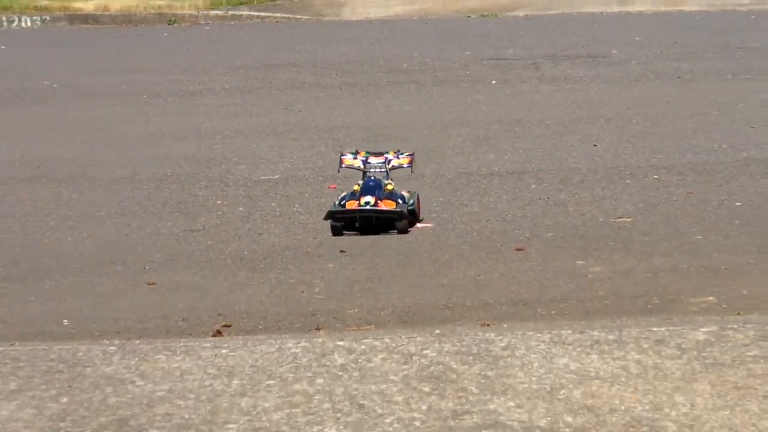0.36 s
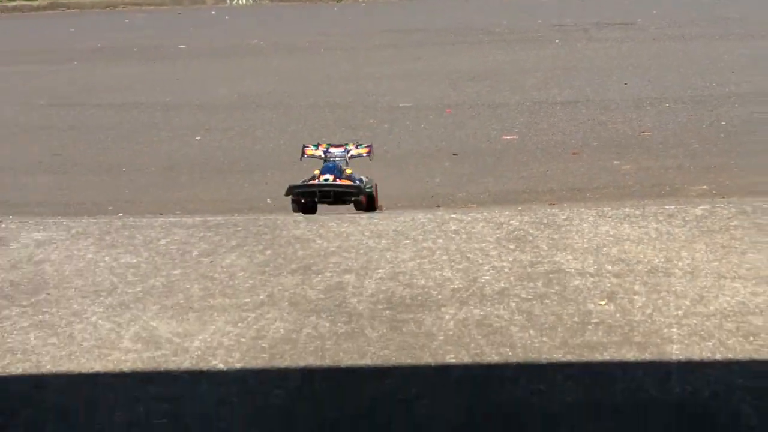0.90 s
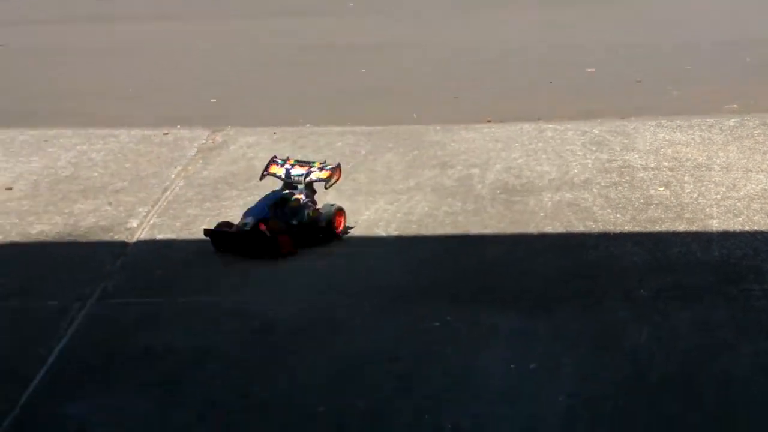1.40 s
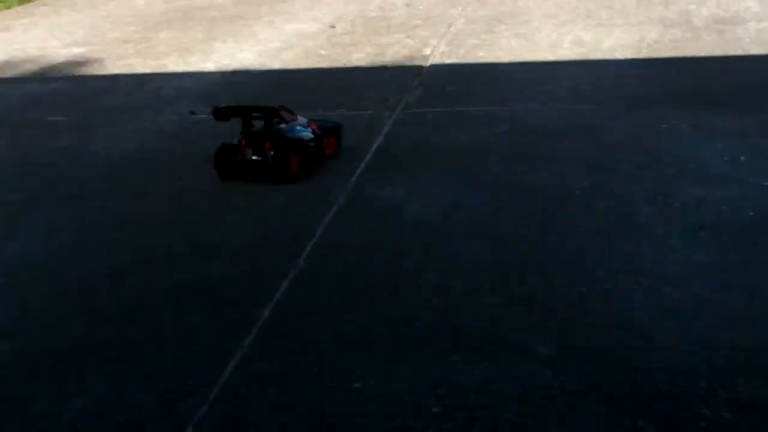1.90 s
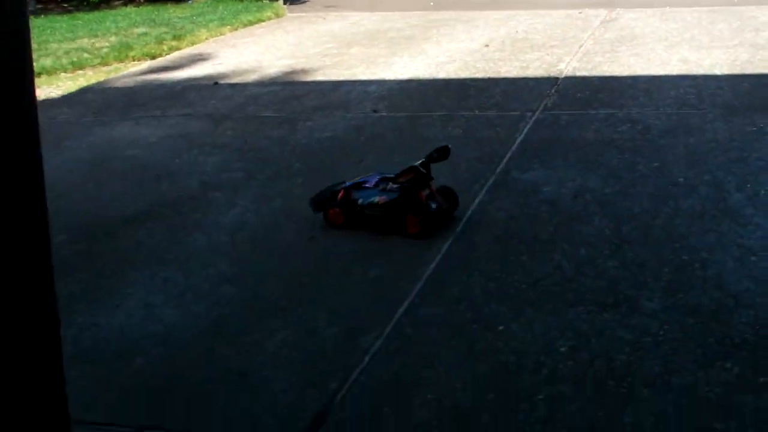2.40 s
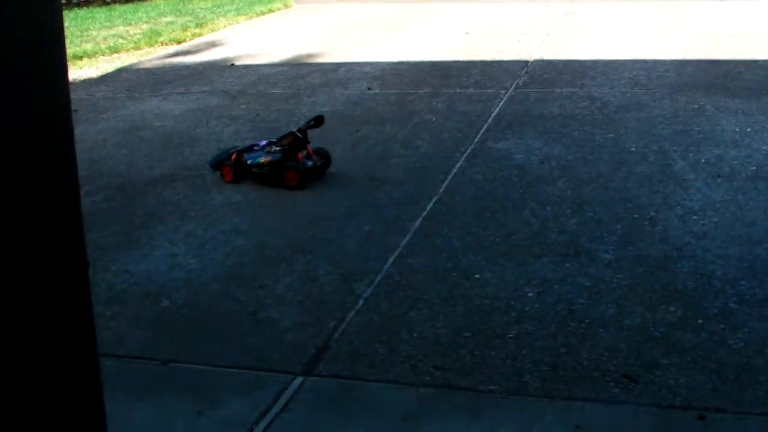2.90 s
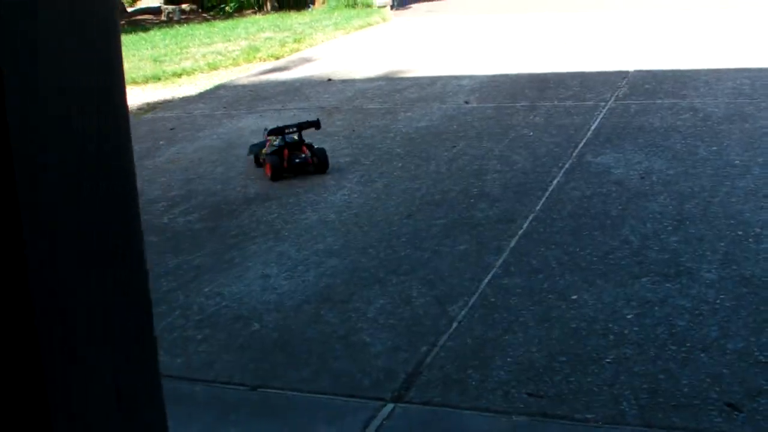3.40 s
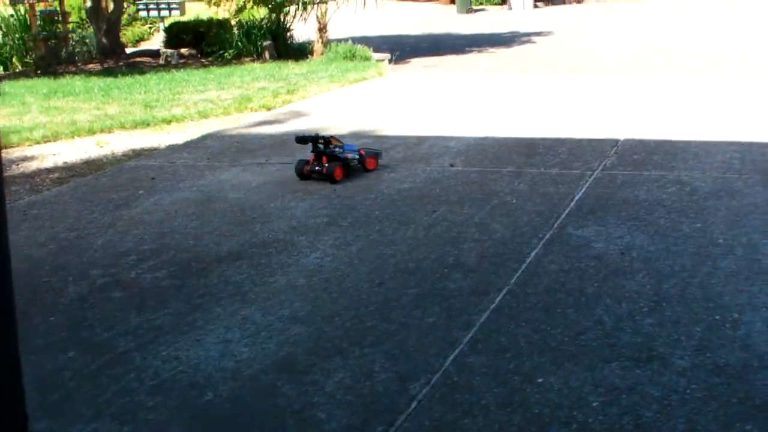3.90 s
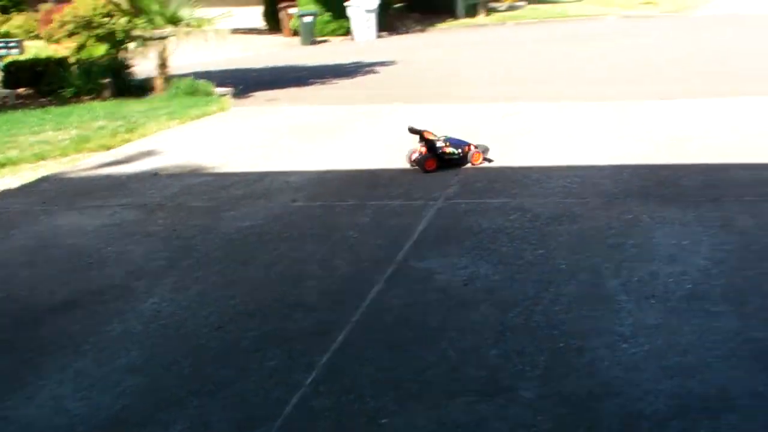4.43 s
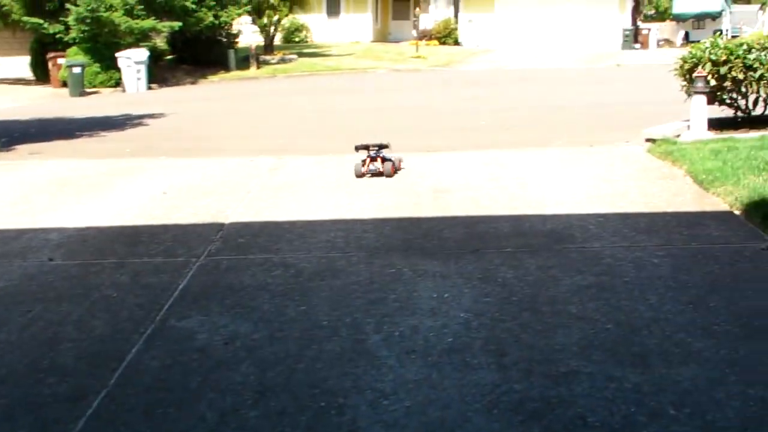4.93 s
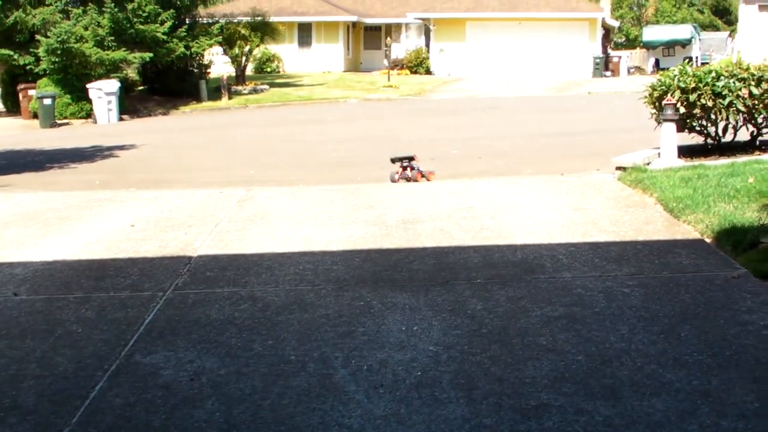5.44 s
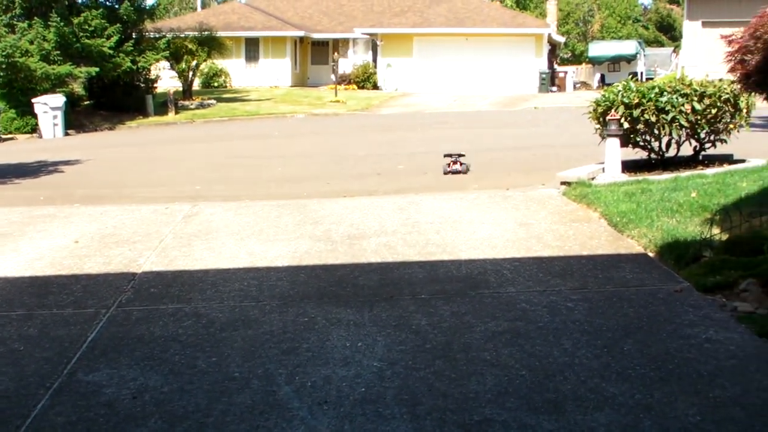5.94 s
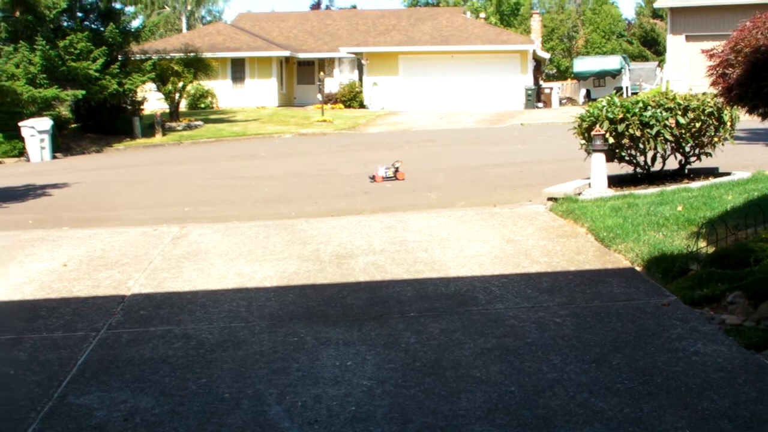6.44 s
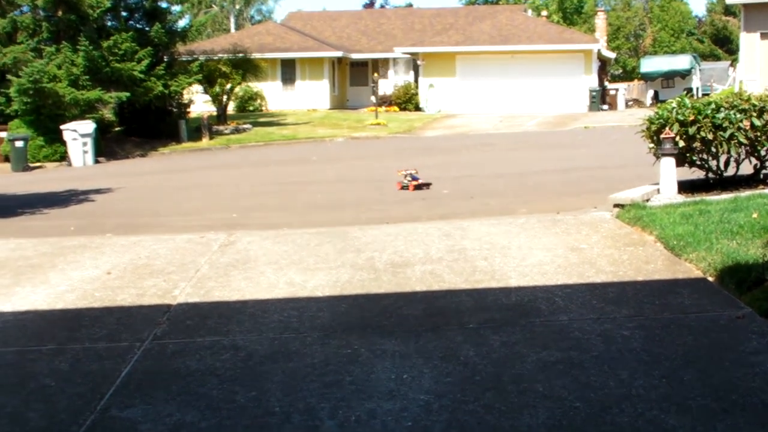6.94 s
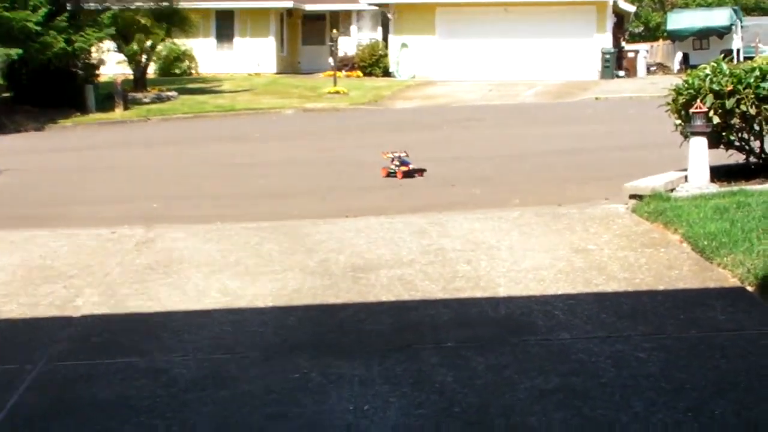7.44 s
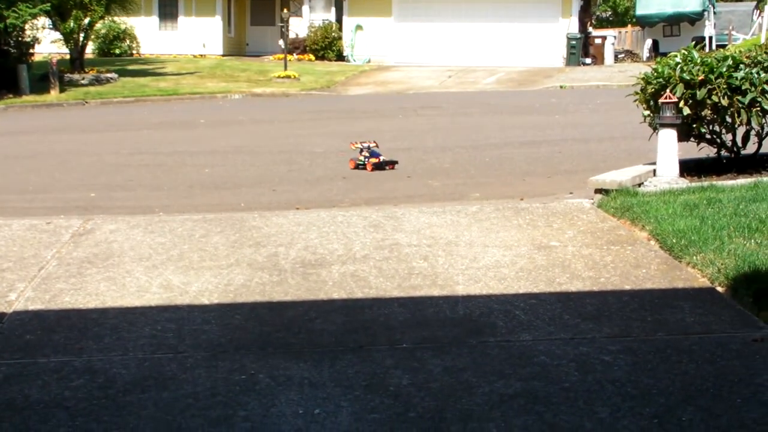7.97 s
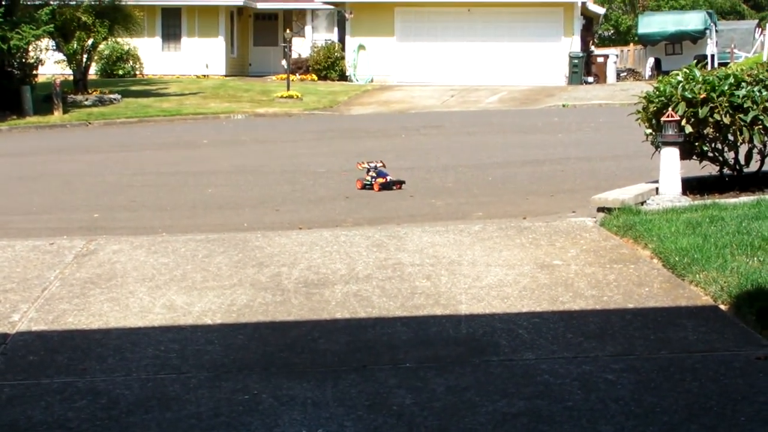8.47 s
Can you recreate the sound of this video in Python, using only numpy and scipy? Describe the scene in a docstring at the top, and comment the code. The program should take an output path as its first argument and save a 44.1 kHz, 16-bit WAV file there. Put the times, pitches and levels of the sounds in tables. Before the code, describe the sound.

A small electric toy car on concrete, heard in stereo from a garage doorway with a short bright echo. From 0 to 1.1 seconds it approaches with a shrill, steady gear whine around 3.3 kHz and fast plastic chatter, with sharper jolts near 0.9. At about 1.25 the tyres burst into a rough, hollow roar as it skids and turns, rattling harshly until 2. The noise drops to a low tyre rumble, nearly quiet at 2.6. Short rising motor whirrs come at 2.8 and 3.1. From 3.5 a lower whine climbs unevenly as the car speeds away, loudest and most clattery at 4.5 to 5.3, then thinning until 5.9. Duller rolling follows, with another dry gear rattle at 6.5 to 7 that dies by 7.3. Quiet street air and faint hum remain, with tiny knocks and one faint rising bird chirp near 8.1.

```python
"""Electric model car at a garage doorway

A small electric model car runs up a drive to a microphone in the doorway, skids, turns and speeds away
to stop in the street. Its gears whine as noise-blurred multiples of the tooth rate and chatter as beaten
noise and short jolts through a plastic chassis; the tyres roar on concrete as bands of patchy noise.
After a fading whirr, a quiet street of shaped noise, a mains hum, a chirping bird and faint knocks remain.
"""
import sys
import numpy as np
from scipy import signal
from scipy.fft import rfft, irfft, next_fast_len
from scipy.io import wavfile
from scipy.ndimage import uniform_filter1d, map_coordinates

SR = 44100
rng = np.random.default_rng(int(sys.argv[2]) if len(sys.argv) > 2 else 0)


def natural_amplitude(level_db):
    """Convert a level in decibels to a linear amplitude factor, elementwise."""
    exponent = np.asarray(level_db, float) / 20
    return 10 ** exponent


def bounce(signal):
    """Save signal as a 16-bit WAV file at the path given by the first command-line argument."""
    frames = np.transpose(np.atleast_2d(signal))
    limited = np.clip(frames, -1, 1)
    pcm = np.round(limited * 32767).astype(np.int16)
    wavfile.write(sys.argv[1], SR, pcm)


N = 378819

# drive train, rattle level before trim and brief changes: t/s, level/dB
RATTLE_LEVEL = [(0, -29.5), (.19, -28), (.3, -28.5), (.79, -25.5), (.83, -33), (1.1, -24.5), (1.24, -35),
                (1.28, -21), (1.36, -35.5), (1.38, -24.5), (1.45, -30), (1.58, -27), (1.67, -18.5),
                (1.93, -18), (2.05, -30.5), (2.42, -30), (2.54, -44.5), (2.66, -41), (2.69, -32.5),
                (2.74, -37), (2.77, -28), (2.82, -30), (2.86, -24.5), (2.915, -26), (2.93, -35),
                (2.97, -38.5), (3.03, -37), (3.05, -29.5), (3.245, -28), (3.265, -35), (3.33, -38),
                (3.36, -25.5), (3.68, -20), (4.04, -18), (4.4, -21), (4.62, -19.5), (4.72, -20),
                (4.86, -16.5), (5.05, -21.5), (5.33, -22), (5.6, -24), (5.8, -26.5), (5.92, -24),
                (5.98, -33.5), (6.53, -36), (6.55, -27.5), (6.78, -27), (6.85, -25.5), (6.95, -28.5),
                (7.03, -28.5), (7.12, -43), (7.3, -53)]
# loud gear jolts: t/s, level/dB before the mix of note and puff, ring f/Hz, length/s (held to 4-30 ms)
LOUD_JOLTS = [(.002, -12, 3210, 0.01), (0.014, -12, 3300, 0.014), (0.033, -9, 3340, 0.0098),
              (0.049, -12, 3260, 0.0091), (0.064, -12, 3230, 0.01), (0.078, -21, 3300, 0.01),
              (0.096, -15, 3270, 0.0098), (0.107, -15, 3330, 0.014), (0.137, -12, 3300, 0.031),
              (0.193, -8.5, 3380, 0.019), (0.238, -10, 3340, 0.016), (0.274, -11, 3410, 0.021),
              (0.33, -7, 3270, 0.011), (0.359, -11, 3370, 0.016), (0.376, -21, 3500, .011),
              (0.419, -10, 3330, 0.016), (0.466, -11, 3410, 0.01), (0.506, -9, 3410, 0.014),
              (0.55, -10.5, 3410, 0.017), (0.591, -16, 3490, 0.021), (0.65, -13.5, 3430, 0.017),
              (0.695, -14, 3490, 0.012), (0.734, -15, 3435, 0.014), (0.806, -8.5, 3480, 0.012),
              (0.837, -4.5, 3430, 0.024), (0.889, -4, 3290, 0.011), (0.9455, 1.5, 3390, 0.014),
              (0.982, -9, 3560, 0.019), (1.002, -3.5, 3320, 0.013), (1.081, -11, 3020, 0.025),
              (1.099, -11, 5000, 0.017), (1.1, -9, 7350, 0.013), (1.14, -17, 4940, 0.022),
              (1.262, -8.5, 2840, 0.0092), (1.277, -8, 1993, 0.016), (1.68, -7, 1870, 0.013),
              (1.697, -7, 4660, 0.016), (1.766, -7.5, 6200, 0.012), (1.821, -8, 3990, 0.0075),
              (1.845, -2, 5160, 0.0042), (1.869, -6.5, 4900, 0.017), (1.921, -6, 5400, 0.01),
              (1.963, -9, 4750, 0.0091), (1.994, -9.5, 5620, 0.021), (2.402, -13.5, 2620, 0.0077),
              (2.91, -19, 8900, 0.0092), (3.05, -11, 4150, 0.0096), (3.088, -13, 5070, 0.018),
              (3.173, -16, 4800, 0.022), (3.193, -14.5, 4690, 0.017), (3.24, -12, 4750, 0.0096),
              (3.347, -19, 2700, 0.013), (4.147, -7, 4500, 0.024), (4.19, -6, 4400, 0.0076),
              (4.207, -10.5, 4720, 0.021), (4.246, -4, 4820, 0.022), (4.284, -5, 4810, 0.0087),
              (4.442, -7, 4780, 0.013), (4.558, -3, 5660, 0.013), (4.745, -3.5, 4870, 0.016),
              (4.786, -16, 2630, 0.013), (4.808, -4, 5490, 0.012), (4.826, -4, 2645, 0.02),
              (4.842, -1.5, 5620, 0.016), (4.858, -8, 2800, 0.024), (4.884, -5, 2725, 0.016),
              (4.899, -5, 2730, .017), (4.919, -3, 4950, .016), (4.944, -7, 4780, 0.0078),
              (4.962, 1, 4560, 0.0079), (4.979, -5, 5770, 0.03), (5.004, -2, 3530, 0.03),
              (5.039, -6, 5600, .016), (5.087, -4, 5620, 0.019), (5.144, -5.5, 5744, 0.013),
              (5.187, -12, 5600, .014), (5.212, -13, 5750, 0.018), (5.264, -13, 5800, 0.02),
              (5.285, -12, 4000, 0.012), (5.307, -14, 4680, 0.015), (5.337, -5, 4020, 0.0084),
              (5.36, -10, 3300, 0.0081), (5.37, -2.5, 4600, 0.018), (5.408, -6, 4610, 0.021),
              (5.44, -6, 4430, 0.013), (5.465, -7, 3830, 0.0083), (5.483, -4, 4670, 0.019),
              (5.546, -10, 4950, 0.015), (5.609, -8, 4550, 0.014), (5.63, -22, 4767, 0.011),
              (5.652, -13, 4710, 0.011), (5.671, -12, 4580, 0.014), (5.709, -8.5, 4570, 0.017),
              (5.755, -10.5, 4600, 0.0099), (5.809, -3.5, 4704, 0.02), (5.856, -5.5, 5540, 0.017),
              (5.868, -8, 4010, 0.021), (5.899, -5, 5590, 0.011), (5.912, -6, 3920, 0.015),
              (6.444, -12.5, 3680, 0.012), (6.536, -8.5, 4950, 0.016), (6.539, -19, 1786, 0.023),
              (6.553, -15, 1996, 0.026), (6.581, -12, 2030, 0.01), (6.601, -15, 3880, 0.013),
              (6.623, -9.5, 4800, 0.015), (6.648, -10, 5180, 0.0092), (6.672, -11, 5110, 0.01),
              (6.687, -11, 3950, 0.015), (6.707, -16, 2690, 0.016), (6.728, -12, 2720, 0.015),
              (6.752, -9, 2840, 0.012), (6.764, -9, 2800, 0.013), (6.784, -7.5, 2950, .013),
              (6.8, -1.5, 3040, 0.0077), (6.818, -15, 5050, .012), (6.876, -16, 4920, 0.013),
              (6.896, -14, 3740, 0.012), (6.91, -16, 2590, 0.022), (6.934, -9.5, 2796, 0.019),
              (6.942, -11.5, 4900, 0.017), (6.964, -17, 4900, .012), (6.997, -17.5, 1960, 0.013)]
# broad gear noise: f/Hz, relative level/dB per Hz
GEAR_HISS = [(650, -16.5), (1100, -12), (1500, -5), (2000, -1.5), (3400, -1.5), (6000, -6), (7500, -3),
             (8300, -6.5), (9500, -3), (12000, -8), (15000, -17)]
# motor speed, one table for each pull of the throttle: t/s, tooth rate f/Hz before slip
TOOTH_RATE = [
    [(0, 3210), (.2, 3290), (.45, 3390), (.8, 3490), (1.05, 3400)],
    [(2.75, 575), (2.81, 610), (2.86, 675), (2.92, 715), (2.96, 725)],
    [(3.07, 620), (3.16, 650), (3.2, 690), (3.28, 700)],
    [(3.48, 750), (3.56, 765), (3.62, 900), (3.7, 1035), (3.82, 1130), (3.88, 1235), (4.0, 1270),
     (4.1, 1350), (4.22, 1400), (4.3, 1550), (4.4, 1615), (4.5, 1720), (4.57, 1820), (4.62, 1915),
     (4.68, 1940), (4.8, 2020), (4.92, 2450), (4.94, 2420)],
    [(4.95, 2380), (4.975, 2050), (5.0, 1870), (5.06, 1890), (5.14, 1965), (5.28, 2010), (5.5, 2250),
     (5.95, 2350)],
]
# how the car stands and runs: t/s, heading (0 front, 1 side, 2 rear to the microphone),
# chassis ring over the hiss level/dB, chatter depth/dB
CAR_POSE = [(0, 0, 0, 3.5), (1.05, 0, 1, 3), (1.2, .5, -5, 3), (1.6, 1.5, -4, 3.5), (2.0, 1.7, -3, 4),
            (2.4, 1.5, -4, 3), (2.6, 1, 10, 1), (2.9, 1, 10, 1), (3.1, 1.4, 3, 2), (3.9, 1.4, 6, 2),
            (4.3, 2, 7, 2.5), (4.7, 2, 2, 2.5), (5.3, 1.8, 3, 3), (5.85, 1.6, 3, 4), (6.0, 2, -3, 2),
            (6.5, 2, -2, 3), (6.6, 2, 0, 3), (6.82, 2, 1, 2), (7.0, 1.8, 2, 1.5), (7.3, 2, -3, 2)]
# plastic chassis resonances: f/Hz, nominal width/Hz, level/dB heard from the front, the side, the rear
CHASSIS_NOTES = [(1800, 110, -5, -14, -12), (2100, 200, -16, -9, -10), (2850, 220, -5, -12, -7),
                 (3420, 260, -5, -9, -6), (3980, 240, -11, -1, -4), (4350, 350, -18, 0, -9),
                 (4780, 320, -16, -2, 0), (5720, 300, -18, -10, -3), (6170, 450, -5, -15, -14),
                 (7550, 350, -11, -10, -6)]


def unit(x):
    """Scaled to rms 1."""
    return x / np.sqrt(np.mean(x ** 2) + 1e-20)


def along(points, hz):
    """(Hz, value) points on a log axis."""
    f, v = np.transpose(points)
    return np.interp(np.log(hz + 1), np.log(f + 1), v)


def curves(rows):
    """One value per sample for each column after the time."""
    s, *cols = np.transpose(rows)
    return [np.interp(np.arange(N) / SR, s, c) for c in cols]


def during(rows, fade=.012):
    """1 while a table lasts, with soft ends of fade seconds outside it."""
    t = np.arange(N) / SR
    rise = t - rows[0][0] + fade
    fall = rows[-1][0] + fade - t
    return np.clip(np.minimum(rise, fall) / fade, 0, 1)


def wobble(rate):
    """A smooth random curve, rate knots a second."""
    knots = rng.standard_normal(int(N * rate / SR) + 4)
    return map_coordinates(knots, [np.arange(N) * rate / SR])


def filtered(x, response):
    """x times a complex response of frequency."""
    m = next_fast_len(N + SR // 2)
    return irfft(rfft(x, m) * response(np.fft.rfftfreq(m, 1 / SR)), m)[..., :N]


def mode(centre, width, db):
    """Response of one resonance, centre and width in Hz."""
    return lambda f: natural_amplitude(db) * 1j * f * width / (centre * centre - f * f + 1j * f * width)


def patchy(patchy_db, channels=1):
    """White noise with time-frequency patches of random gain."""
    z = signal.stft(rng.standard_normal((channels, N)), nperseg=256)[2]
    field = rng.standard_normal(z.shape[1:])
    field = uniform_filter1d(uniform_filter1d(field, 3, 0), 5, 1)
    return signal.istft(z * natural_amplitude(patchy_db * unit(field)), nperseg=256)[1][:, :N]


def even(swell):
    """A swell that keeps the mean power, averaged over 1/8 s."""
    return swell / np.sqrt(np.abs(uniform_filter1d(swell ** 2, SR // 8)))


def street():
    """Far traffic and air as wide shaped noise, with a wavering mains hum."""
    # street colour: f/Hz, relative level/dB per Hz
    colour = [(15, -55), (25, -36), (40, -25), (62, -15.5), (90, -5), (169, -9), (283, -15.5), (400, -6.5),
              (569, -12.5), (830, -12.5), (1500, -20.5), (2100, -20.5), (7360, -26), (12000, -29.5),
              (15700, -30)]
    # street noise: t/s, level/dB
    street_level = [(0, -44.5), (2, -46.5), (4, -43.5), (6, -47), (7.3, -46), (7.8, -48), (8.59, -49.5)]
    # likeness of the two channels: f/Hz, correlation (-1 to 1)
    alike = [(30, .8), (60, 0.99), (180, 0.82), (550, 0.64), (1650, 0.77), (4970, 0.15), (15000, -0.54)]

    def mid_side(hz):
        turn = np.arccos(np.clip(along(alike, hz), -1, 1)) / 2
        return natural_amplitude(along(colour, hz)) * [np.cos(turn), np.sin(turn)]

    mid, side = filtered(patchy(0.99, channels=2), mid_side)
    air = unit(np.array([mid + side, mid - side]))
    hum = natural_amplitude(-59.5 + 2.6 * wobble(5.5)) * np.sin(2 * np.pi * 120 * np.arange(N) / SR)
    return natural_amplitude(curves(street_level)[0]) * air + hum


def garage(x):
    """The walls behind the microphone answer, each frequency dying at its own speed."""
    # decay of the garage: f/Hz, t60/s
    decay = [(300, 0.19), (2000, 0.31), (10000, 0.084)]
    # echo colour: f/Hz, level/dB
    wet_level = [(300, -28), (1000, -15), (4000, -8), (12000, 0.5)]
    hz, t, z = signal.stft(rng.standard_normal((2, SR // 3)), SR, nperseg=256)
    tail = signal.istft(z * natural_amplitude(-60 * t / along(decay, hz)[:, None]), SR, nperseg=256)[1]
    tail = tail / np.linalg.norm(tail[0])
    late = np.pad(x, (120, 0))[None]  # delay in samples, about 2.7 ms
    wet = signal.fftconvolve(late, tail, axes=1)[:, :N]
    return filtered(wet, lambda hz: natural_amplitude(along(wet_level, hz)))


def bird():
    """One faint rising chirp, a gliding sine."""
    # chirp: t/s, f/Hz, rms level/dB
    chirp = [(8.125, 2220, -68), (8.14, 2280, -60), (8.17, 2420, -60), (8.19, 2500, -66)]
    hz, db = curves(chirp)
    return during(chirp) * natural_amplitude(db) * np.sqrt(2) * np.sin(2 * np.pi * np.cumsum(hz) / SR)


def knocks():
    """Dull plastic knocks and ticks: decaying sines with a brief noise at the start."""
    # knocks: t/s, level/dB before trim and onset, ring f/Hz, t60/s
    hits = [(0.829, -9.5, 730, 0.035), (1.177, -14, 722, 0.091), (1.265, -11, 396, 0.12),
            (2.132, -18.5, 1085, 0.094), (2.386, -21, 692, 0.066), (3.295, -25, 438, .1),
            (4.69, -17.5, 681, 0.11), (4.748, -19, 395, 0.067), (4.855, -22, 387, .07),
            (4.9, -15.5, 407, 0.1), (4.936, -17, 437, 0.085), (6.94, -24, 650, 0.12),
            (6.993, -21, 963, .06), (7.004, -24, 439, 0.17), (7.029, -14, 1720, 0.033),
            (7.2569, -16, 2600, 0.007), (7.2997, -10, 2840, 0.0056), (7.591, -27, 416, 0.044),
            (8.383, -25, 496, 0.037)]
    out, t = np.zeros(N + SR), np.arange(SR // 8) / SR
    for s, db, hz, t60 in hits:
        click = 0.2 * rng.standard_normal(len(t)) * natural_amplitude(-60 * t / 0.01)
        ring = np.sin(2 * np.pi * hz * t) + click
        onset = 1 - np.exp(-t / 0.0022)
        out[round(s * SR):][:len(t)] += natural_amplitude(db - 4.0 - 60 * t / t60) * onset * ring
    return out[:N]


def tyres():
    """Knobbly tread drums on the grit: a low boom, two shell notes, a thud and a duller wash."""
    # roar of the tyres: t/s, level/dB before the layer trims
    roar_level = [(0, -32), (.84, -29), (1.07, -31.5), (1.15, -36), (1.19, -22.5), (1.26, -24.5),
                  (1.28, -16), (1.4, -20.5), (1.57, -19), (1.64, -22.5), (1.7, -20.5), (1.76, -26),
                  (1.9, -24.5), (2.0, -31), (2.3, -28), (2.4, -28), (2.55, -46), (2.64, -37), (3.26, -37.5),
                  (3.32, -33.5), (3.77, -35), (4.7, -29), (5.05, -31), (5.6, -31), (6.33, -28), (6.92, -43),
                  (7.0, -37.5), (7.15, -49), (7.4, -75)]
    # low boom over the roar, before trim and sway: t/s, level/dB
    boom_level = [(0, -4.5), (.8, -1.5), (1.1, 4), (1.21, -38), (1.28, -9), (1.45, 6), (1.6, -5.5),
                  (1.85, 4), (2.2, -31), (2.4, 0), (2.85, -22), (3.3, -7), (4.6, -4.5), (4.9, -3),
                  (5.7, -3), (6.35, -16.5), (6.95, -3), (7.4, 0)]
    # wash over the roar: t/s, level/dB
    wash_level = [(0, -7), (1.1, -3), (1.3, -8), (1.45, -9), (1.6, -2.5), (2, -2.5), (2.6, -2.5), (3.5, -2),
                  (4.6, -5), (5.0, -2.5), (5.8, -10), (6.0, -10.5), (6.5, -9.5), (6.7, -5), (7.4, 4.5)]
    # cavity, two shell notes and thud: f/Hz, width/Hz of a single pass, level/dB (evened out by unit)
    tread = [(450, 100, 0), (720, 120, 0), (870, 140, 0), (150, 140, 0)]
    grit = natural_amplitude(0.7 * wobble(70) + 1.25 * wobble(18))

    def drum(row):
        resonance = mode(*row)
        return unit(grit * filtered(patchy(2.8)[0], lambda hz: resonance(hz) ** 2))  # two passes

    def dull(hz):
        low = 1 / (1 + (hz / 1050) ** 6)
        high = 0.89 / (1 + (hz / 2200) ** 4)
        return (low + high) / (1 + (360 / (hz + 1)) ** 10)

    boom, shell, rim, thud = (drum(row) for row in tread)
    wash = unit(grit * filtered(patchy(0.95)[0], dull))
    boom_db = curves(boom_level)[0] + 4 * wobble(12) - 10.0
    layers = natural_amplitude(boom_db) * boom + natural_amplitude(-8.5) * shell + natural_amplitude(-15) * rim + natural_amplitude(-30.5) * thud
    layers = layers + natural_amplitude(curves(wash_level)[0]) * wash
    return during(roar_level) * natural_amplitude(curves(roar_level)[0]) * layers


def chatter():
    """Slack in the gears takes up in uneven beats, in step with the loud jolts; about rms 1 around 0."""
    # chatter before its random wander: t/s, beat rate f/Hz
    beat_rate = [(0, 66), (.71, 66), (1.34, 47.4), (1.95, 48), (2.56, 70.4), (4.0, 75), (4.37, 51),
                 (5.12, 43), (5.7, 48), (6.3, 35.5), (6.79, 58), (7.3, 58)]
    half_beat_s, pull_s = .008, .016  # crest to trough; how far a loud jolt draws the beat into step
    turns = np.cumsum(curves(beat_rate)[0]) / SR + .09 * wobble(14)
    free = unit(np.cos(2 * np.pi * turns) * (1 + .35 * wobble(25)) + .3 * wobble(30))
    crests = np.sort([s + length / 2 for s, _, _, length in LOUD_JOLTS])
    t = np.arange(N) / SR
    k = np.clip(np.searchsorted(crests, t), 1, len(crests) - 1)
    away = np.minimum(abs(t - crests[k - 1]), abs(t - crests[k]))  # seconds to the nearest crest
    pull = np.clip(2 - 2 * away / pull_s, 0, 1)
    in_step = np.sqrt(2) * np.cos(np.pi * np.minimum(away / half_beat_s, 1))
    return (1 - pull) * free + pull * in_step


def chassis(face):
    """Gain of the chassis heard from one side: steep peaks, dark valleys."""
    def gain(f):
        power = 0
        for row in CHASSIS_NOTES:
            centre, width = row[:2]
            power = power + natural_amplitude(2 * row[2 + face]) / (1 + (2 * (f - centre) / width) ** 2) ** 1.5
        return np.sqrt(power)
    return gain


def notes(beat):
    """Notes the running car holds for a while: narrow bands that waver and throb with the chatter."""
    # held notes: from t/s, to t/s, from f/Hz, to f/Hz, level/dB before throb, rate of random spread/Hz
    held = [(0, 0.298, 1790, 1800, -43, 76), (.32, 0.777, 1800, 1797, -38.5, 45),
            (0, 0.803, 2880, 2863, -38.5, 277), (1.38, 1.623, 480, 452, -31, 70),
            (1.45, 1.739, 853, 860, -29, 83), (2.168, 2.422, 721, 715, -36.5, 64),
            (2.671, 2.773, 4150, 4140, -42, 400), (2.772, 2.903, 4150, 4340, -32.5, 800),
            (3.491, 3.548, 760, 763, -34.5, 28), (3.66, 3.86, 3540, 3460, -33.5, 200),
            (3.642, 3.86, 4700, 4560, -31.5, 210), (3.72, 4.0, 5850, 5700, -35, 350),
            (3.93, 4.058, 3840, 4050, -33, 150), (4.1, 4.3, 4820, 4760, -30.5, 216),
            (4.698, 4.826, 3950, 3980, -32, 150), (4.779, 4.931, 2665, 2734, -32, 131),
            (5.029, 5.29, 5710, 5790, -31, 150), (5.3, 5.756, 3450, 3450, -37.5, 250),
            (4.901, 5.3, 3390, 3340, -32.5, 350), (6.999, 7.108, 2150, 752, -46, 60),
            (7.201, 7.58, 1900, 1864, -57, 500), (7.62, 8.05, 1830, 1810, -64, 300)]
    t, out = np.arange(N) / SR, np.zeros(N)
    throb = even(natural_amplitude(3.5 * beat))  # depth in dB
    for s0, s1, hz0, hz1, db, width_hz in held:
        on = during([(s0,), (s1,)])
        i = on > 0
        phase = 2 * np.pi * np.cumsum(np.interp(t[i], [s0, s1], [hz0, hz1])) / SR
        knots = [(t[i] - s0 + .02) * width_hz]
        a, b = (map_coordinates(rng.standard_normal(500), knots) for _ in range(2))
        clean = 50 / width_hz  # the narrower the note, the purer its tone
        band = (clean + a) * np.sin(phase) + b * np.cos(phase)
        out[i] += natural_amplitude(db) * (on * throb)[i] * band / np.sqrt(1 + clean ** 2 / 2)
    return out


def small_jolts():
    """Chance jolts follow the rattle's level; they ring facing chassis notes or, under throttle, teeth."""
    per_s, clear_s, length_s = 18, .022, 0.016  # never on top of a loud jolt
    over_db, scatter_db = -5.5, 4  # level against the rattle, before slack, and its scatter
    count = int(RATTLE_LEVEL[-1][0] * per_s)
    late, size = rng.random(count), rng.standard_normal(count)
    pick = rng.gumbel(size=(count, len(CHASSIS_NOTES)))
    s = (np.arange(count) + late) / per_s
    i = (s * SR).astype(int)
    heading, _, depth_db = (c[i] for c in curves(CAR_POSE))
    plastic = np.array(CHASSIS_NOTES)[1:]  # without the lowest note
    facing = plastic[:, 2:][:, np.round(heading).astype(int)].T
    hz = plastic[:, 0][np.argmax(facing / 2 + pick[:, 1:], axis=1)]  # louder notes are likelier
    mesh_hz = sum((during(rows) > .5) * curves(rows)[0] for rows in TOOTH_RATE)[i]
    multiple = np.maximum(np.round(hz / (mesh_hz + 1)), 1)
    hz = np.where(mesh_hz > 0, multiple * mesh_hz, hz)
    slack_db = 2 * (depth_db - 3)  # more slack, harder jolts
    db = curves(RATTLE_LEVEL)[0][i] + over_db + slack_db + scatter_db * size
    clear = np.abs(s[:, None] - np.array(LOUD_JOLTS)[:, 0]).min(axis=1) > clear_s
    rows = zip(s, db, hz, np.full(count, length_s))
    return [row for row, ok in zip(rows, clear) if ok]


def jolts():
    """Each jolt swells and dies: a puff of tooth noise with one note standing out."""
    out, t = np.zeros(N + SR), np.arange(SR // 32) / SR
    noise, heading = rng.standard_normal(N), curves(CAR_POSE)[0]

    def heard_from(face):
        colour = lambda hz: natural_amplitude(along(GEAR_HISS, hz)) * (0.25 + chassis(face)(hz))
        return unit(filtered(noise, colour))

    puffs = np.where(heading < .5, heard_from(0), heard_from(2))
    for s, db, hz, length in LOUD_JOLTS + small_jolts():
        u = np.clip(t / np.clip(length, .004, .03), 0, 1)
        swell = np.sin(np.pi * u ** .9) ** 2  # power under 1: peaks a little early
        note = np.sin(2 * np.pi * hz * t + .12 * np.cumsum(rng.standard_normal(len(t))))
        i = round(s * SR)
        out[i:i + len(t)] += natural_amplitude(db) * swell * (0.24 * note + 0.11 * puffs[i:i + len(t)])
    return out[:N]


def rattle(beat):
    """Tooth noise, beaten by the chatter, rings the chassis; turning the car changes what rings."""
    # short rises and one dip of the rattle: t/s, length/s, change of level/dB
    brief_changes = [(0.202, 0.022, -3), (0.841, 0.061, 11.5), (0.936, 0.03, 6), (0.998, 0.035, 3),
                     (1.084, 0.085, 1.5), (2.088, 0.06, 4.5), (2.24, 0.05, 5), (4.516, 0.11, 1.5),
                     (5.34, 0.022, 4), (6.441, 0.017, 13)]
    # treble of the rattle over its body, before trim: t/s, level/dB
    treble_level = [(0, -8.5), (1.1, -4.5), (1.26, -13), (1.38, -4), (2.4, -2.5), (2.8, -12), (3.0, 0.5),
                    (3.06, -8), (3.7, -8), (4.45, 1), (5.3, -2), (6.5, -1.5), (6.8, -6), (7.0, -10),
                    (7.1, -9), (7.3, -30)]
    db = curves(RATTLE_LEVEL)[0] - 5.5
    for s, length, gain_db in brief_changes:
        db = db + gain_db * during([(s,), (s + length,)])
    heading, ring_db, depth_db = curves(CAR_POSE)
    noise = patchy(4.3)[0]
    ring = 0
    for face in range(3):
        share = np.clip(1 - abs(heading - face), 0, 1)  # blends neighbouring sides
        ring = ring + share * unit(filtered(noise, chassis(face)))
    broad = filtered(patchy(2.44)[0], lambda hz: natural_amplitude(along(GEAR_HISS, hz)))
    top = filtered(broad, lambda hz: 1 / (1 + (6500 / (hz + 1)) ** 8))
    body = (natural_amplitude(ring_db) * ring + unit(broad - top)) / np.sqrt(1 + natural_amplitude(2 * ring_db))
    treble = natural_amplitude(curves(treble_level)[0] - 4.5) * unit(top)
    return during(RATTLE_LEVEL) * natural_amplitude(db) * even(natural_amplitude(depth_db * beat)) * (body + treble)


def whine(beat):
    """Tooth contacts sing at the mesh rate; uneven teeth spread each multiple into a narrow band."""
    # in each pull, before beat and chassis: t/s, level/dB of tooth rate, 2nd multiple, 3rd multiple
    loads = [
        [(0, -32.5, -60, -66), (.2, -31.5, -60, -66), (.45, -34, -62, -66), (.8, -42, -60, -66),
         (1.05, -47, -60, -66)],
        [(2.75, -43, -39, -40), (2.82, -32, -39, -43), (2.87, -22, -31.5, -42), (2.93, -26.5, -35, -39),
         (2.96, -31, -41, -45)],
        [(3.07, -32.5, -36.5, -32), (3.15, -34, -39, -55), (3.19, -29.5, -32.5, -41), (3.24, -33, -35, -44),
         (3.28, -46, -36, -55)],
        [(3.48, -48, -29, -60), (3.53, -52, -38, -45), (3.58, -44, -46, -38), (3.68, -30.5, -38, -51),
         (3.78, -28, -43, -40), (3.9, -29, -28, -30), (4.0, -22, -37, -29), (4.07, -30, -47, -46),
         (4.11, -30.5, -29, -31), (4.2, -27.5, -44, -44), (4.3, -31.5, -33, -28.5), (4.42, -35.5, -29.5, -26),
         (4.5, -33.5, -30, -32), (4.57, -25, -25, -28), (4.68, -34, -37, -40), (4.73, -54, -31, -50),
         (4.85, -58, -41, -52), (4.94, -45, -23, -47)],
        [(4.95, -28, -28, -48), (4.98, -23.5, -23, -36), (5.06, -25, -22.5, -26), (5.12, -25.5, -23, -43),
         (5.2, -25.5, -26, -42), (5.28, -32.5, -32, -46), (5.33, -46, -59, -49), (5.45, -34, -35, -45),
         (5.6, -44, -30, -58), (5.95, -54, -51, -60)],
    ]
    # teeth in mesh in each pull: steadiness (ratio), beat depth/dB, loss/dB from the 3rd multiple
    # to the 4th, and to the 5th
    grips = [(2.2, 5, 20, 20), (3, -2, 4, 6.5), (1, -0.5, 9, 5.7), (1.2, 1.5, 7, 8), (1.3, 2.5, 9, 20)]
    # the wheels slip and grip: t/s, random share of speed (ratio), random break-up/dB
    slipping = [(0, .005, 1), (2.7, .006, 1.5), (3.0, .015, 3), (3.6, .022, 3), (4.25, .025, 3),
                (4.32, .008, 1.5), (4.7, .014, 3), (5.0, .008, 2), (5.95, .008, 2.5)]
    share, break_db = curves(slipping)
    slip = 1 + share * wobble(75) + .012 * beat  # each beat gives and takes a share of speed
    flutter = break_db * wobble(22)
    spread = [(wobble(150 * k), wobble(150 * k)) for k in (1, 2, 3, 4, 5)]
    out = np.zeros(N)
    for speed, load, (steady, depth_db, fourth_db, fifth_db) in zip(TOOTH_RATE, loads, grips):
        on = during(speed)
        i = on > 0
        phase = 2 * np.pi * np.cumsum((curves(speed)[0] * slip)[i]) / SR
        first_db, second_db, third_db = curves(load)
        swell = (on * even(natural_amplitude(depth_db * beat + flutter)))[i]
        levels = [first_db, second_db, third_db, third_db - fourth_db, third_db - fifth_db]
        for k, (db, (a, b)) in enumerate(zip(levels, spread), 1):
            clean = steady / k ** .7  # higher multiples blur more
            band = (clean + a[i]) * np.sin(k * phase) + b[i] * np.cos(k * phase)
            out[i] += natural_amplitude(db[i]) * swell * band / np.sqrt(1 + clean ** 2 / 2)
    return filtered(out, lambda f: .7 + .8 * chassis(2)(f))  # louder where it crosses a rear chassis note


def scene():
    """The car, its echo from the garage, the bird and the street."""
    beat = chatter()
    car = whine(beat) + rattle(beat) + notes(beat) + jolts() + tyres() + knocks()
    car = filtered(car, lambda hz: 1 / (1 + (90 / (hz + 1)) ** 4))  # too small to radiate deep bass
    return car + garage(car) + bird() + street()


def roll_off(x):
    """The treble ends steeply here."""
    return signal.sosfilt(signal.butter(12, 15810, fs=SR, output="sos"), x)


def record(dry):
    """The stereo pair leans a little, the treble dips and ends, and half the line frequency is notched out."""
    # treble colour of the whole sound, a dip near 12 kHz and a cut above 15.1 kHz: f/Hz, level/dB
    treble_colour = [(8500, 0.5), (10500, -2), (11400, -8), (12000, -13), (12700, -4), (14000, 0),
                     (15100, 0), (15900, -60)]
    # lean of the stereo pair: f/Hz, left minus right level/dB
    lean = [(60, -1), (240, -0.5), (950, -1), (3770, -1.0), (15000, -0.5)]
    notch_hz = 7875  # half the camera's line frequency

    def response(hz):
        gap = notch_hz ** 2 - hz * hz
        notch = (gap / (gap + 1j * hz * 240)) ** 2
        return notch * natural_amplitude(along(treble_colour, hz) + np.outer([.5, -.5], along(lean, hz)))

    mix = filtered(dry, response)
    return roll_off(mix)


dry = scene()
out = record(dry)
bounce(out)
```